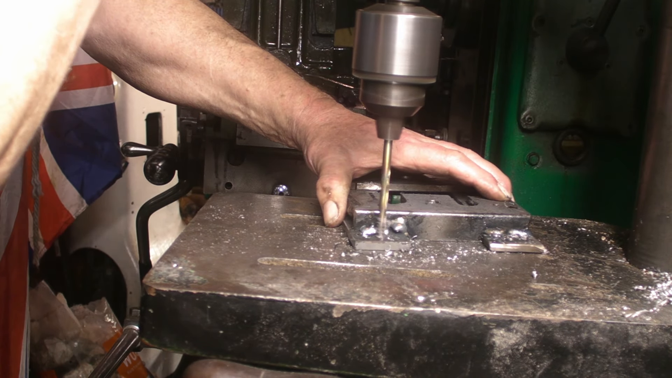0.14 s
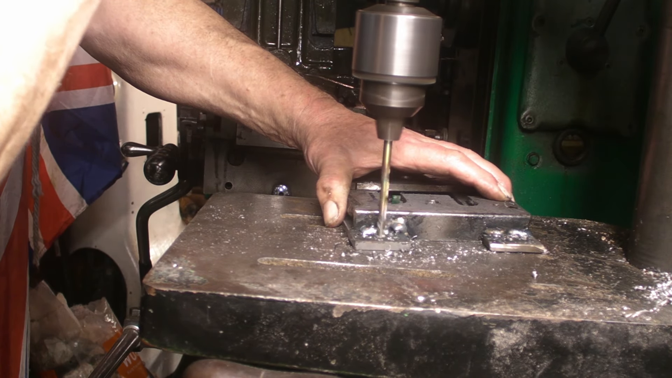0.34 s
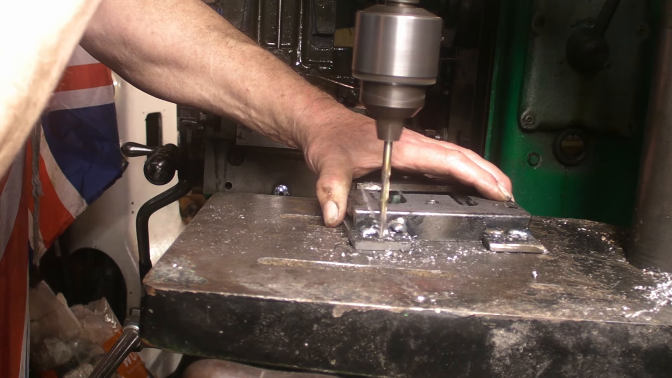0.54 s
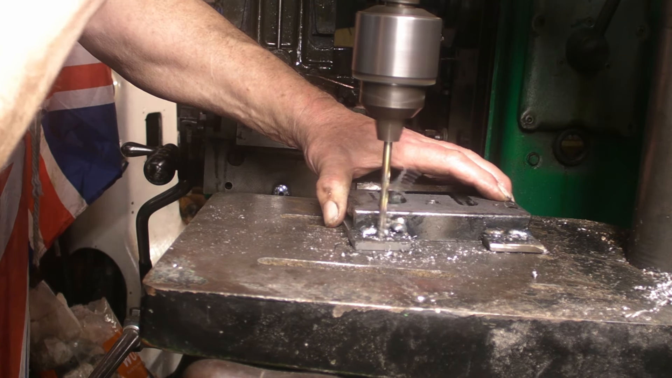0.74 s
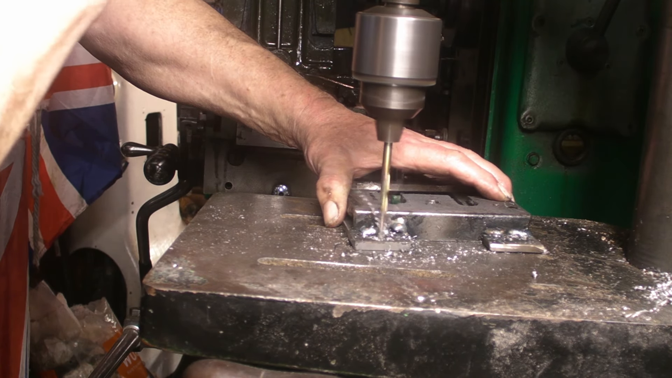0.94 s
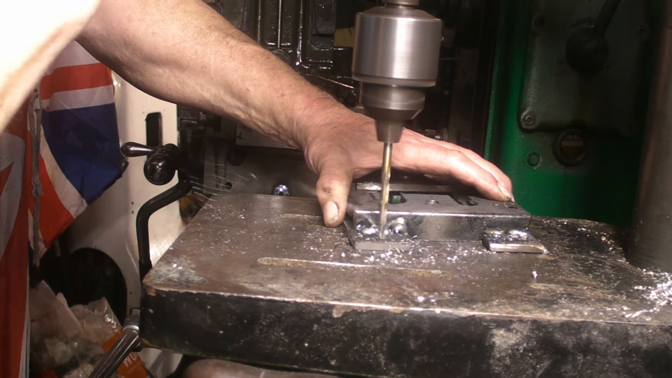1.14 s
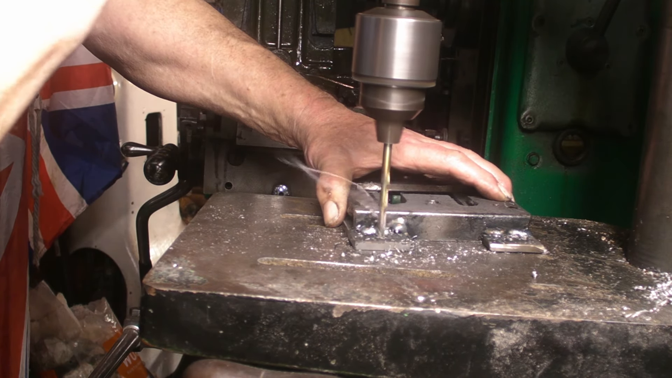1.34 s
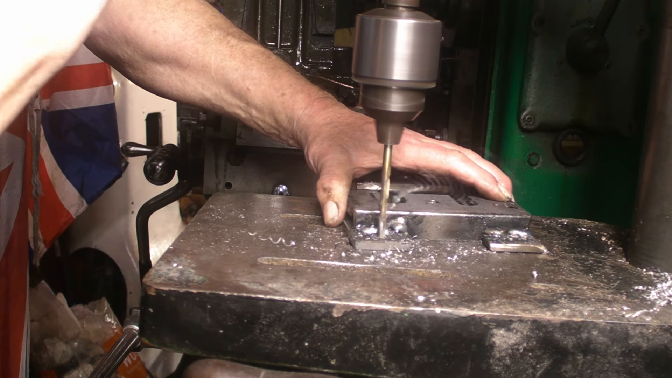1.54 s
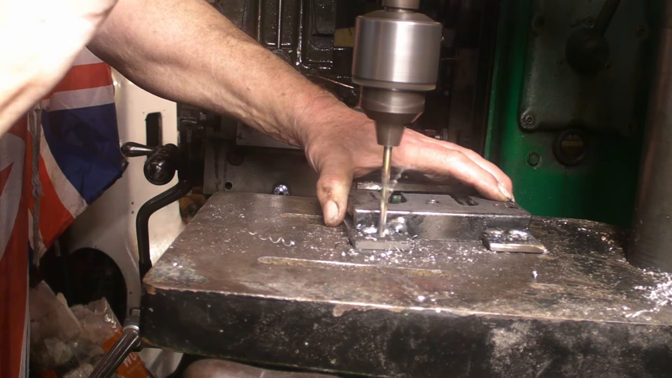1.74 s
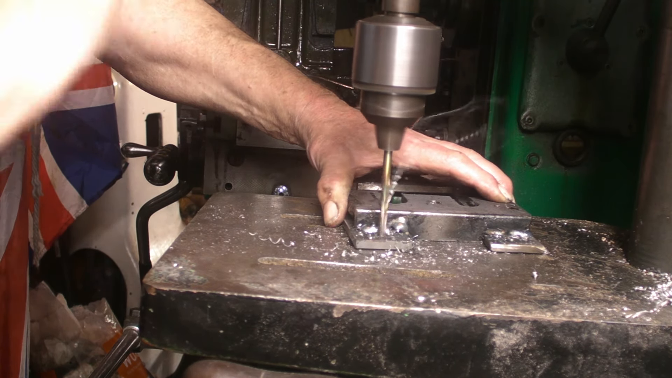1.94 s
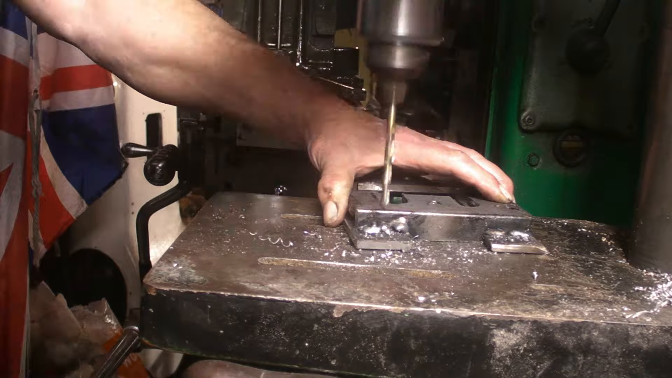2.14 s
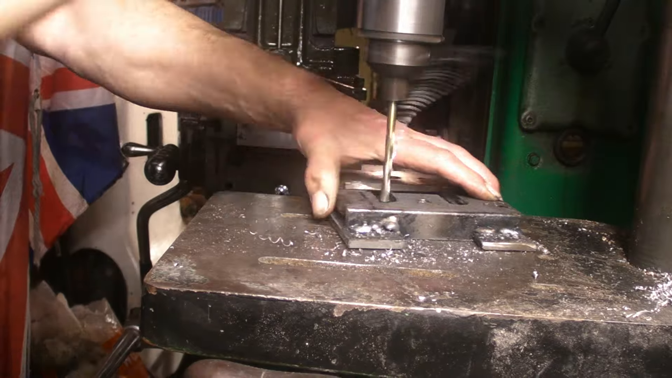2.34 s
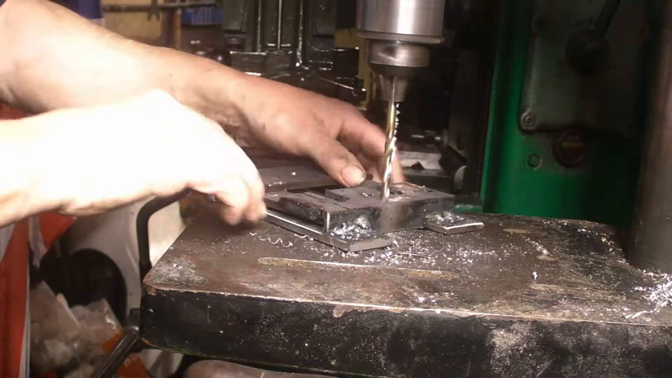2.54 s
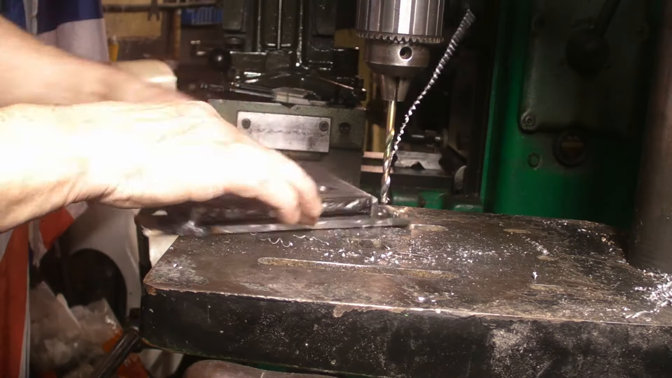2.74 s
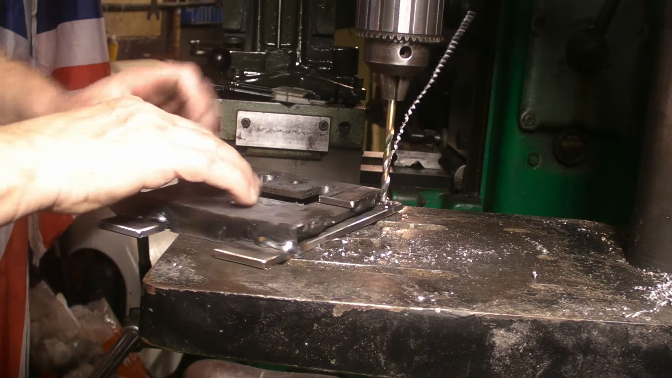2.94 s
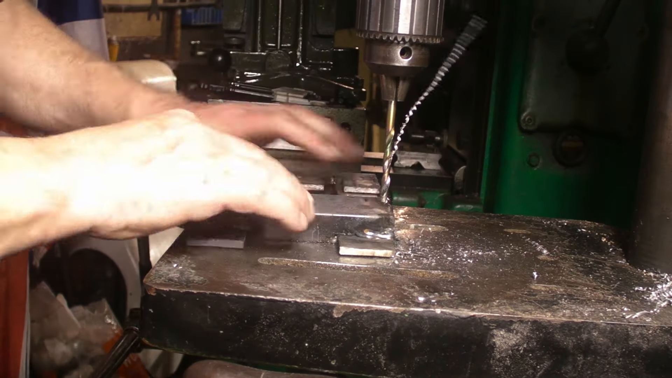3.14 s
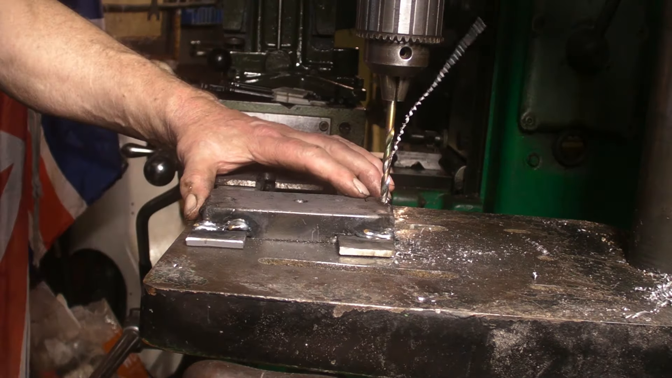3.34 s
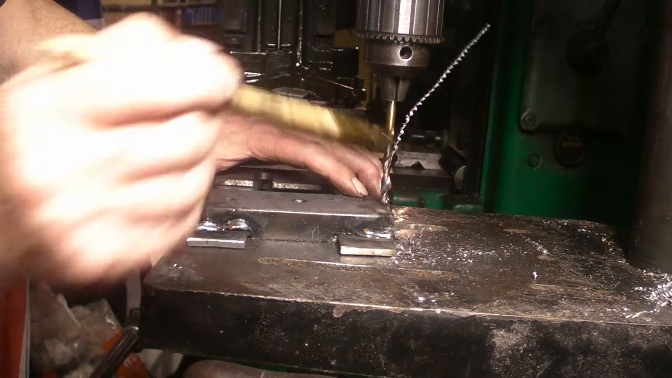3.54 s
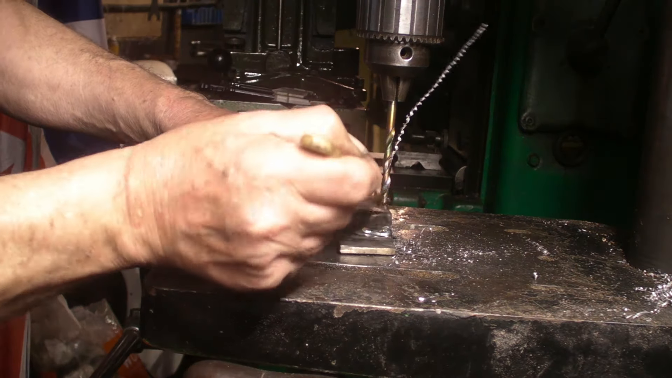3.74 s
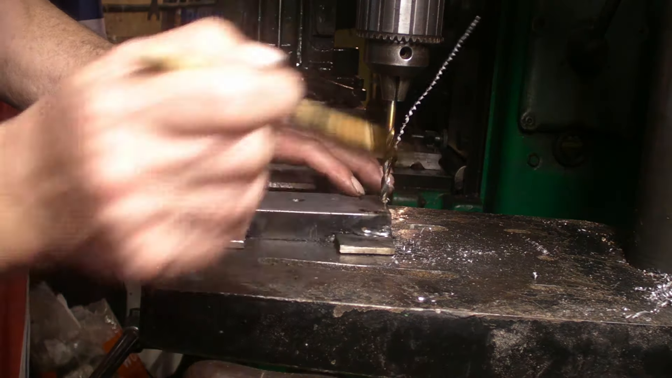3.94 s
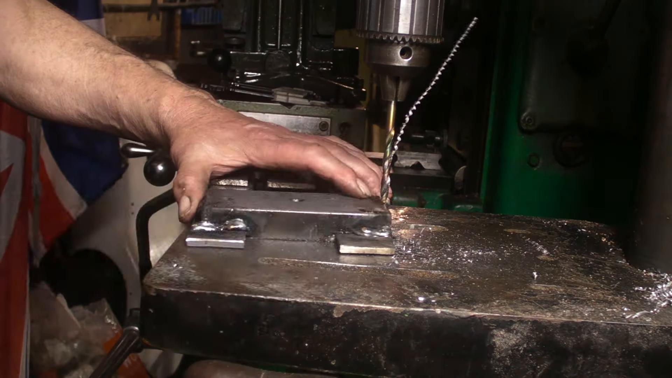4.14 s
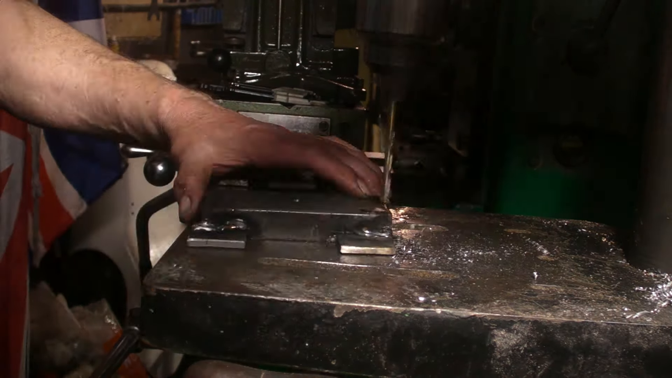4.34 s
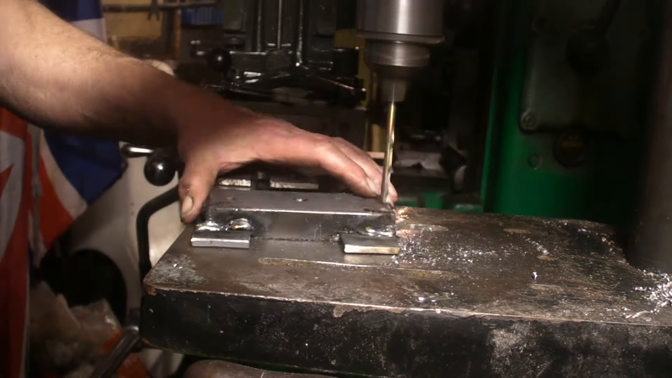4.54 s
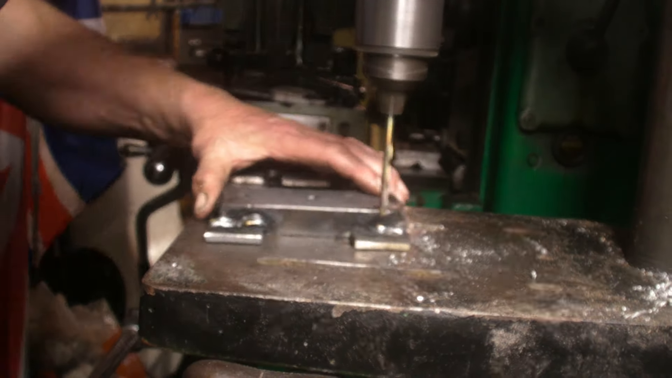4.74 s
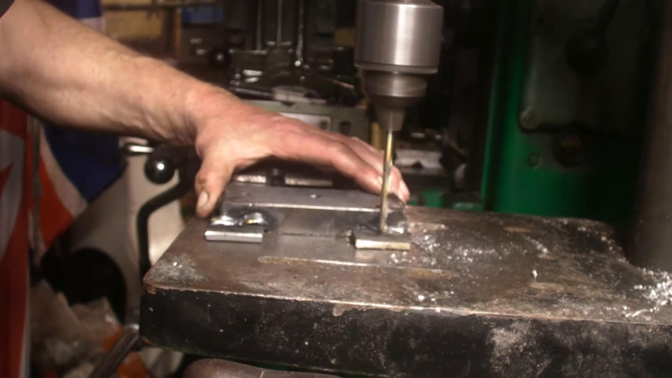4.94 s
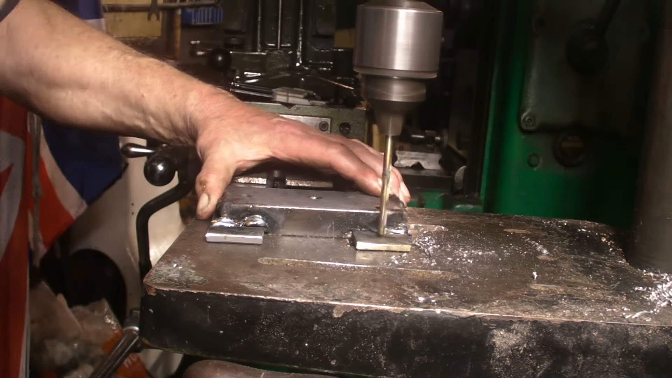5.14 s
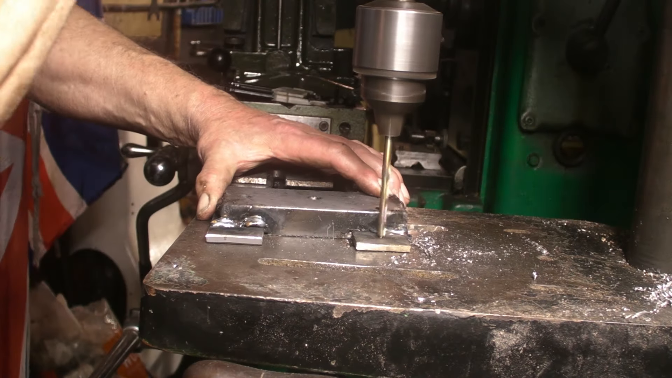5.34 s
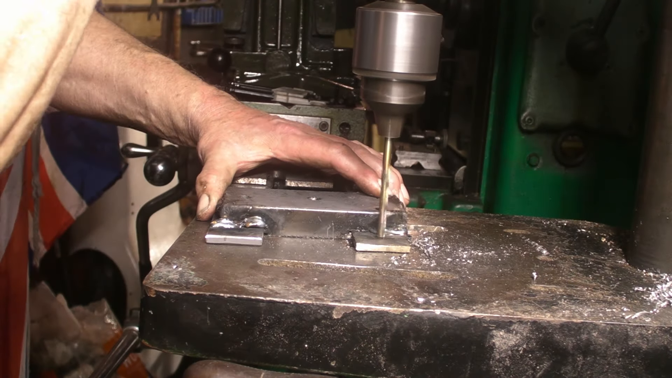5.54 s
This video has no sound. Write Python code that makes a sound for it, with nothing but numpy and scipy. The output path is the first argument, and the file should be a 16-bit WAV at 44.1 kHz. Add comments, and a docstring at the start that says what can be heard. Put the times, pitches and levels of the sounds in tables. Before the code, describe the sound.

Close in a small workshop, a pillar drill bores steel: low wavering motor hum, bright metallic hiss and coarse ringing crunch. The cut thins, squeals briefly and stops. The hand-held part scrapes and clatters over the iron table, followed by soft taps and a sharper knock in near quiet. A click restarts the motor and a lighter cut begins. Close stereo microphone, little echo.

```python
"""A pillar drill bores a small steel part held by hand on its cast-iron table, close by in a workshop.
The motor hums as wavering sines, the spindle's noise hisses through ringing steel, and the bit's lips
tear off chips as bursts of fracture grains that ring the part. The drill stops and its rub dies away;
the part is slid round with stick-slip scrapes, scratches, knocks and finger brushes.
Then comes a click, and the second hole begins."""
import sys
import numpy as np
from scipy import signal
from scipy.fft import rfft, irfft
from scipy.io import wavfile
from scipy.ndimage import uniform_filter1d, map_coordinates

SR = 44100
rng = np.random.default_rng(int(sys.argv[2]) if len(sys.argv) > 2 else 0)


def digitize_waveform(pressure):
    """Quantize a signal to 16-bit integers and store it at the path in sys.argv[1].

    Rows of a 2-D input are taken as channels; values are limited to [-1, 1].
    """
    field = np.atleast_2d(pressure).T
    bounded = np.clip(field, -1, 1)
    quanta = np.round(bounded * 32767).astype(np.int16)
    wavfile.write(sys.argv[1], SR, quanta)


N = 250488
TAPS = 8192  # length of a body's response in samples
TIME = np.arange(N) / SR
GRID = np.maximum(np.arange(TAPS // 2 + 1) * SR / TAPS, 1)  # Hz
SIDES = np.array([[1], [-1]])  # left, right

# Hush of the quiet workshop. Each row: frequency in Hz, relative level in dB.
ROOM_COLOUR = [(18, -33), (30, -3), (59, 0), (102, -3), (277, -1), (332, -6), (673, -7), (728, -7),
               (874, -12), (1440, -13), (4780, -15), (9190, -13), (15500, -25)]
ROOM_LEVEL_DB = -56.2

# Difference between the two channels. Each row: frequency in Hz, side minus mid in dB.
STEREO_WIDTH = [(60, -9.5), (130, -11), (300, -12), (700, -8), (1400, -4.8), (2800, -1), (15000, 0)]
# Balance of the two channels. Each row: frequency in Hz, left minus right in dB.
STEREO_LEAN = [(60, 1.8), (130, 2.8), (400, 2.7), (800, 1.8), (2500, 1.7), (5000, 1), (8500, -1),
               (11000, -2), (14000, -5)]
LEFT_LAG_S, TOP_HZ = .00009, 15600

# Skin on steel. Each row: frequency in Hz, relative level in dB.
RUB_COLOUR = [(1000, -25), (4000, -14), (7000, -7), (9500, 0), (11000, -7), (13000, -12), (15500, -20)]
# Fingers brushing over the part. Each row: peak in s, time from peak to 1/e in s, level in dB.
RUBS = [(2.591, .012, -35), (2.917, .007, -43), (3.272, .014, -53), (3.41, .02, -53), (3.44, .01, -53),
        (3.477, .009, -47), (3.542, .008, -53), (4.02, .025, -57), (4.155, .035, -56), (4.325, .018, -55)]

# Soft contact of hand and part. Each row: frequency in Hz, relative level in dB.
THUMP_COLOUR = [(40, -6), (130, 0), (300, 0), (600, -8), (1200, -17), (3000, -25), (9000, -24),
                (15000, -45)]
# Hand and bit settling on the part, and a clunk as the drill starts again. Each row: peak in s, time from peak
# to 1/e in s, level in dB.
THUMPS = [(2.435, .014, -28.5), (2.49, .01, -35), (2.67, .012, -38), (2.795, .012, -38), (3.424, .007, -42),
          (3.485, .012, -43), (3.692, .012, -47), (3.737, .017, -42.5), (3.892, .012, -51),
          (3.955, .012, -46), (4.388, .01, -32)]

# Swarf crushed under the part. Each row: frequency in Hz, relative level in dB.
GRIT_COLOUR = [(500, -12), (2000, -3), (4500, 0), (7000, -2), (9200, 2), (11000, -10), (12700, -18),
               (14500, -20), (16000, -30)]

# Body struck by a knock. Each row: frequency in Hz, relative level in dB.
KNOCK_COLOUR = [(60, -18), (200, -3), (520, 3), (800, -6), (1300, -4), (2200, -5), (3000, -10), (3600, -17),
                (4400, -9), (5500, -22), (15000, -45)]
# Resonances shared by every knock. Each row: frequency in Hz, nominal width in Hz, lift in dB.
KNOCK_MODES = [(1250, 90, 5), (1960, 90, 6), (2600, 140, 6), (3140, 100, 10), (4450, 80, 8), (5280, 90, 9)]
# Knocks and taps. Each row: start in s, thud in dB, tick in dB, decay to 1/e in s,
# resonance favoured by the point of contact in Hz, its lift in dB.
KNOCKS = [(2.444, -26, -32, .005, 2700, 17), (2.4965, -37, -16, .0035, 5860, 22),
          (3.424, -28, -59, .0025, 560, 17), (3.475, -37, -58, .006, 220, 19),
          (3.483, -36, -48, .0015, 900, 6), (3.653, -41, -60, .007, 285, 19),
          (3.724, -38, -44, .003, 1500, 8), (3.794, -37, -54, .005, 646, 22),
          (3.9575, -35, -36, .0018, 730, 10), (4.178, -16.7, -27, .005, 500, 7),
          (4.3385, -35, -36, .004, 3900, 12)]

# The table's lowest clear note. One row: frequency in Hz, decay by 60 dB in s.
TABLE_NOTE = (727, .25)
# Blows that leave the table ringing. Each row: start in s, level in dB.
RINGS = [(3.165, -47), (3.797, -54), (3.958, -56)]

# Sharp edges scratching steel. Each row: peak in s, time from peak to 1/e in s, level in dB,
# lower ring in Hz, upper ring in Hz, lift of both rings in dB.
SCRATCHES = [(2.263, .01, -24, 3470, 4110, 17), (2.364, .007, -26, 2650, 8400, 13),
             (2.386, .008, -25, 4500, 8090, 12), (2.413, .009, -26, 4950, 8490, 13),
             (2.43, .006, -27, 4300, 7900, 8), (2.446, .009, -22, 2710, 4740, 13),
             (2.497, .004, -23, 5860, 9200, 13), (2.508, .008, -31, 3300, 9200, 9),
             (2.528, .006, -29, 6000, 8200, 10), (2.795, .006, -26, 2900, 5200, 10),
             (2.922, .006, -42, 4240, 8800, 8), (2.968, .011, -35, 5000, 7600, 8),
             (3.072, .011, -37, 3600, 7500, 8), (3.15, .011, -32, 5900, 8600, 10),
             (3.176, .012, -42, 5700, 8800, 7), (4.342, .005, -37, 3900, 5200, 12)]

# The part on the iron table. Each row: frequency in Hz, relative level in dB.
TABLE_COLOUR = [(40, -20), (130, -11), (280, -5.5), (470, -3), (700, -1.5), (1000, -7), (1600, -2.5),
                (2000, -10), (2700, -12), (4000, -20), (9000, -30), (15000, -50)]
# Resonances of the table. Each row: frequency in Hz, nominal width in Hz, lift in dB.
TABLE_MODES = [(385, 50, 5), (583, 70, 9.5), (730, 14, 5), (890, 50, 2), (1160, 70, 5), (1370, 50, 12),
               (1540, 60, 5), (1740, 50, 4), (2090, 45, 7)]
# Scrapes and rubs. Each row: peak in s, length between its 1/e points in s, table level in dB,
# grit level in dB, resonance favoured by the point of contact in Hz, its lift in dB.
SLIDES = [(2.447, .022, -23.5, -27, 1530, 13), (2.478, .016, -29, -50, 760, 11),
          (2.53, .026, -36, -38, 1150, 10), (2.614, .024, -33, -54, 900, 14),
          (2.643, .034, -22.8, -41, 880, 14), (2.692, .014, -36, -50, 2090, 11),
          (2.736, .009, -29, -44, 1320, 14), (2.76, .012, -31, -44, 1340, 15),
          (2.795, .016, -27, -32, 1110, 10), (2.826, .012, -29, -43, 560, 12),
          (2.848, .01, -29, -56, 540, 10), (2.89, .016, -32, -44, 1700, 10),
          (2.95, .042, -19.3, -35.5, 570, 8), (2.964, .02, -25, -42, 1650, 14),
          (3.03, .014, -25, -41, 1620, 15), (3.044, .014, -25.5, -44, 1380, 15),
          (3.06, .032, -24, -37.5, 650, 13), (3.134, .021, -21.5, -32, 560, 6),
          (3.158, .018, -19, -33, 1370, 15), (3.272, .025, -57, -54, 1150, 8),
          (3.483, .021, -49, -54, 900, 8), (3.602, .042, -44.5, -49, 1750, 10),
          (3.664, .02, -46.5, -51, 680, 13), (3.692, .016, -47.5, -52, 1180, 12),
          (3.736, .02, -38.5, -44, 1180, 11), (3.765, .022, -43.5, -49, 830, 11),
          (3.84, .035, -52, -57, 650, 14), (3.894, .02, -50, -54, 1200, 10),
          (3.953, .015, -44, -42, 620, 10), (4.13, .045, -62, -56, 730, 8),
          (4.312, .022, -50, -58, 520, 10), (4.346, .016, -44, -41, 820, 10)]
# Steady movements over the table. Each row: start in s, end in s, table level in dB,
# grit level in dB, favoured resonance in Hz.
DRAGS = [(2.46, 2.55, -33, -46, 760), (2.6, 2.705, -37, -41.5, 900), (2.735, 2.81, -34.5, -40, 1340),
         (2.81, 2.915, -35, -49, 570), (2.895, 3.3, -57, -56, 730), (3.57, 3.88, -56, -61, 650),
         (3.91, 4.37, -74, -66, 730)]
DRAG_FADE_S, DRAG_UNEVEN_DB = .03, 2.2
RISE_SHARE = .45  # part of a stroke spent speeding up
STROKE_SQUARENESS = 1.9  # flatness of a stroke's top
GRIT_SPREAD = 1.15  # length of the grit's sound relative to its stroke

# Rub of the coasting bit. Each row: frequency in Hz, relative level in dB.
COAST_COLOUR = [(30, -30), (70, -11), (150, -1), (280, -1), (450, -2.5), (800, -3), (1500, -4), (2200, -12),
                (4000, -11), (6000, -12), (8800, -7), (10700, -12), (13000, -23), (15500, -31)]
# Resonances under that rub. Each row: frequency in Hz, nominal width in Hz, lift in dB.
COAST_MODES = [(150, 40, 4), (265, 50, 6), (580, 60, 7), (740, 45, 6), (1190, 70, 8), (1540, 110, 9),
               (2720, 160, 8), (4050, 220, 7), (4850, 250, 5), (8300, 400, 5)]
# level at switch-off, steady fall, duration and last fade of the rub
COAST_DB, COAST_SAG_DB_PER_S, COAST_S, COAST_FADE_S = -27, 20, .295, .06

# Motor runs. Each row: on in s, off in s, mean spindle hiss in dB, swells of the hiss per second,
# time of one crest in s, hum level in dB.
RUNS = [(-1, 2.266, -20, 2.05, .99, -2.5), (4.388, 7, -18, 2.8, 5.08, -.3)]
# Motor hum, one list for each run. Each row: mean frequency in Hz, level in dB before the run's hum level.
HUM_LINES = [
    [(150.7, -44), (301.5, -47), (403.7, -43), (549.1, -39), (705.2, -41)],
    [(129.2, -45), (263.8, -47), (398.4, -43), (500.6, -45), (694.4, -39)],
]
# Machine frame. Each row: frequency in Hz, relative level in dB.
FRAME_COLOUR = [(25, -50), (50, -22), (70, -12), (120, -5), (220, -7.5), (450, -6.5), (700, -8),
                (1200, -17), (3000, -34)]
# Resonances of the frame. Each row: frequency in Hz, nominal width in Hz, lift in dB.
FRAME_MODES = [(142, 50, 7.5), (272, 50, 5), (402, 36, 9), (505, 30, 4), (702, 36, 12)]
# Spindle and chuck. Each row: frequency in Hz, relative level in dB.
SPINDLE_COLOUR = [(1000, -22), (2300, -15), (2900, -11), (3700, -9.5), (4150, -6.5), (5800, -3.8),
                  (7000, -2), (9000, -.7), (10300, -.5), (10900, -6.5), (12200, -11), (12800, -20),
                  (13700, -13), (14700, -18), (15600, -32)]
# Their resonances. Each row: frequency in Hz, nominal width in Hz, lift in dB, left minus right in dB.
SPINDLE_MODES = [(6260, 70, 4, 0), (6885, 45, 9, 2), (6975, 35, 7, 2), (7170, 65, 12, 6), (7310, 40, 7, 2),
                 (7490, 60, 8, -5), (8170, 60, 3, -4), (8380, 90, 3, -4), (9070, 45, 6, 0),
                 (9390, 70, 6, -1), (9545, 70, 11, 0), (9710, 90, 6, -2), (9980, 120, 8, 3),
                 (10330, 150, 9, 4)]
SWELL_DB, RUMBLE_DB = .9, -28  # depth of the hiss's slow swell; level of the frame's rumble

# Stages of the work: first hole, breaking through, second hole. Each row: start in s, end in s,
# fade in in s, fade out in s, extra hiss in dB.
STAGES = [(-1, 1.7, .012, .25, 0), (1.7, 2.268, .25, .012, 2.1), (4.376, 7, .008, .012, 0)]
# Tearing metal, one list for each stage. Each row: frequency in Hz, relative level in dB.
CUT_COLOURS = [
    [(150, -20), (400, -8.5), (600, 0), (900, -.5), (1500, -4.5), (2400, -9.8), (3300, -10), (5000, -11.5),
     (8000, -16), (15000, -40)],
    [(150, -20), (400, -8), (600, -.5), (900, -2), (1500, -4), (2400, -10), (3400, -14), (5000, -12),
     (8000, -16), (15000, -40)],
    [(150, -20), (400, -9), (600, -.5), (900, -2), (1700, -4.7), (2300, -13), (2900, -10.5), (3700, -15),
     (5000, -12), (15000, -40)],
]
# Resonances of the hand-held part, one list for each stage. Each row: frequency in Hz,
# nominal width in Hz, lift in dB.
HOLE_MODES = [
    [(555, 75, 9), (805, 30, 5), (900, 60, 3), (1100, 35, 4), (1360, 80, 7), (1565, 50, 7), (1800, 40, 3),
     (1995, 140, 10.5), (2340, 130, 8), (2684, 36, 14), (2838, 30, 15.5), (3000, 300, 5), (3220, 90, 6),
     (4800, 110, 8), (5080, 90, 6), (5440, 90, 5)],
    [(490, 40, 6), (590, 50, 5), (1210, 70, 5), (1350, 60, 6), (1540, 70, 7), (1750, 70, 6), (2300, 200, 5),
     (2850, 120, 7)],
    [(590, 60, 5), (935, 50, 5), (1195, 45, 8), (1312, 35, 8), (1465, 45, 8), (1550, 50, 6), (1805, 55, 10),
     (1700, 60, 4), (2060, 120, 4), (2400, 60, 3), (2850, 130, 6), (3150, 100, 2)],
]
# How hard the bit is fed into the steel. Each row: time in s, cutting level in dB.
FEED = [(0, -20.5), (.35, -20.5), (.9, -21), (1.27, -20.4), (1.55, -21.2), (1.75, -24), (1.93, -27),
        (2.24, -26.5), (4.39, -28), (4.45, -30), (4.53, -27), (4.72, -27), (4.86, -27.4), (5.2, -27),
        (5.55, -25.5), (5.68, -26.5)]
# Moments when the bit grabs and squeals. Each row: peak in s, time from peak to 1/e in s,
# extra cutting level in dB, squeal in Hz, squeal level in dB, sag of the hiss in dB.
GRABS = [(2.053, .014, -22, 1530, -30, 4.5), (2.185, .018, -25, 1300, -28, 1),
         (2.264, .011, -29, 1455, -17, 5), (4.381, .005, -21, 1250, -25, 1),
         (4.391, .007, -20, 1080, -20, 1), (4.53, .045, -33, 1470, -26.5, 1),
         (4.735, .024, -35, 1465, -29, .5)]


def undb(db):
    """Level law: a gain is ten to the power of its decibels over twenty."""
    return 10 ** (np.asarray(db) / 20)


def unit(x):
    """Power normalisation: the signal is scaled to rms 1."""
    return x / np.sqrt(np.mean(x ** 2))


def slope(points, hz=GRID):
    """Spectral envelope: straight lines in dB over the logarithm of frequency."""
    f, db = np.transpose(points)
    return np.interp(np.log(hz), np.log(f), db)


def tint(x, points, share=1):
    """Zero-phase filtering: the spectrum is weighted without delay."""
    hz = np.maximum(np.arange(N // 2 + 1) * SR / N, 1)
    return irfft(rfft(x) * undb(share * slope(points, hz)), N)


def ring(force, colour, modes=()):
    """Forced vibration: a causal, minimum-phase body answers a force with resonances over a broad colour."""
    power = np.ones((2, len(GRID)))
    for hz, width, db, *pan in modes:
        lift = undb(db + SIDES * sum(pan) / 2) ** 2 - 1
        detuning = (GRID - hz) / (.7 * width)
        power = power + np.maximum(lift, 0) / (1 + detuning ** 2) ** 2
    cepstrum = irfft(np.log(undb(slope(colour)) * np.sqrt(power)))
    cepstrum[:, 1:TAPS // 2] *= 2  # a body answers only after it is pushed
    cepstrum[:, TAPS // 2 + 1:] = 0
    response = irfft(np.exp(rfft(cepstrum)))
    response = response / np.sqrt(np.sum(response ** 2) / 2)
    return signal.fftconvolve(force, response, axes=1)[:, :force.shape[1]]


def stereo(pair):
    """Mid-side coherence: two unrelated signals become channels alike in the bass and apart in the treble."""
    mid, side = pair[0], tint(pair[1], STEREO_WIDTH)
    return unit(mid + SIDES * side)


def noise():
    """Gaussian noise: countless independent pushes merge into a smooth stereo force."""
    return stereo(rng.standard_normal((2, N)))


def grains(rate, scatter_db):
    """Shot noise: tiny fractures or slips of scattered size strike at random, rate of them a second."""
    size = (rng.random(N) < rate / SR) * undb(scatter_db * rng.standard_normal(N))
    return stereo(size * rng.standard_normal((2, N)))


def walk(rate):
    """Band-limited fluctuation: random points, rate a second, joined by lines, with spread near 1."""
    steps = rng.standard_normal(4096)
    return 1.2 * np.interp(TIME * rate, np.arange(len(steps)), steps)


def switched(on, off, fade_in=.012, fade_out=.012):
    """Gating: 1 between on and off, with sloped ends centred on those times."""
    return np.clip((TIME - on) / fade_in + .5, 0, 1) * np.clip((off - TIME) / fade_out + .5, 0, 1)


def bump(s, length):
    """Gaussian envelope: a smooth rise and fall around one moment."""
    return np.exp(-((TIME - s) / length) ** 2)


def around(s):
    """Locality: the stretch of samples in which a short event lives."""
    return slice(int(s * SR) - TAPS, int(s * SR) + TAPS)


def sine(hz, waver, rate):
    """Frequency modulation: the phase integrates a frequency that wavers by a share of itself."""
    return np.sin(2 * np.pi * np.cumsum(hz * (1 + waver * walk(rate))) / SR)


def drift(pair, depth_s, rate):
    """Varying delay: sound read a little early or late makes resonances slide as the contact shifts."""
    late = depth_s * uniform_filter1d(walk(rate), int(SR / rate))
    return np.array([map_coordinates(side, [(TIME - late) * SR], mode="mirror") for side in pair])


def workshop(near, echo_db=-25, t60=.25):
    """Diffuse reverberation: cluttered walls return a faint, short, decaying echo over the room's own hush."""
    t = TIME[:TAPS]
    tail = rng.standard_normal((2, TAPS)) * undb(-60 * t / t60)
    tail = tail / np.sqrt(np.sum(tail ** 2) / 2)
    echo = signal.fftconvolve(near, tail, axes=1)[:, :N]
    hush = undb(ROOM_LEVEL_DB + .7 * walk(9)) * ring(noise(), ROOM_COLOUR)
    return undb(echo_db) * echo + hush


def finger_rubs(grain_db=2):
    """Light friction: skin brushing over steel and fine swarf gives a thin hiss of small slips."""
    touch = sum(undb(db) * bump(s, length) for s, length, db in RUBS)
    return ring(grains(5000, grain_db) * touch, RUB_COLOUR)


def thumps():
    """Soft impact: hand and bit settle gently on the part and the drill clunks as it restarts, so mostly bass
    comes out."""
    push = sum(undb(db) * bump(s, length) for s, length, db in THUMPS)
    return ring(noise() * push, THUMP_COLOUR)


def knocks(width_hz=100):
    """Impact excitation: short blows of hand, part and machine favour a resonance at each point of contact."""
    thuds, tick, contact = np.zeros((2, N)), 0, noise()
    for s, thud_db, tick_db, decay, hz, lift_db in KNOCKS:
        span = around(s)
        blow = (TIME >= s) * np.exp(-np.abs(TIME - s) / decay)
        force = undb(thud_db) * blow[span] * contact[:, span]
        thuds[:, span] += ring(force, KNOCK_COLOUR, KNOCK_MODES + [(hz, width_hz, lift_db)])
        tick = tick + undb(tick_db) * blow
    return thuds + ring(noise() * tick, GRIT_COLOUR)


def table_note():
    """Free decay: after a blow the iron table sings on faintly at one note, dying exponentially."""
    hz, t60 = TABLE_NOTE
    out = 0
    for s, db in RINGS:
        age = np.maximum(TIME - s, 0)
        out = out + undb(db) * np.exp(-np.log(1000) * age / t60) * np.sin(2 * np.pi * hz * age)
    return out


def scratches(width_hz=200, judder_db=1.5):
    """Skidding contact: flutes, burrs and trapped chips slip over steel, each ringing at two pitches."""
    out = np.zeros((2, N))
    skids = grains(14000, 1.5) * undb(judder_db * walk(400))
    for s, length, db, low_hz, high_hz, lift_db in SCRATCHES:
        span = around(s)
        force = undb(db) * bump(s, length)[span] * skids[:, span]
        out[:, span] += ring(force, GRIT_COLOUR, [(low_hz, width_hz, lift_db), (high_hz, width_hz, lift_db)])
    return out


def sliding(judder_db=1.4, width_hz=50, shared=.95, pan_db=-1.4, drag_width_hz=35,
            drag_favour_db=13, catch_db=-10, drift_s=.00015):
    """Stick-slip friction: each stroke of steel over iron rings the table its own way, and swarf crackles."""
    judder = undb(judder_db * walk(300))
    push, out, crush = undb(DRAG_UNEVEN_DB * walk(35)), 0, 0
    creep = grains(7000, 1.5) * judder
    for on, off, table_db, grit_db, hz in DRAGS:
        moving = push * switched(on, off, DRAG_FADE_S, DRAG_FADE_S)
        modes = TABLE_MODES + [(hz, drag_width_hz, drag_favour_db)]
        out = out + ring(undb(table_db) * moving * creep, TABLE_COLOUR, modes)
        crush = crush + undb(grit_db) * moving
    # fine slips and coarse catches on burrs
    slips = (grains(7000, 1.5) + undb(catch_db) * grains(450, 2)) * judder
    # during a stroke the pressing hand damps the table's own resonances a little
    pressed = [(hz, width, shared * db) for hz, width, db in TABLE_MODES]
    for s, length, table_db, grit_db, hz, lift_db in SLIDES:
        span = around(s)
        t = TIME[span] - s
        reach = np.abs(t / (length * np.where(t < 0, RISE_SHARE, 1 - RISE_SHARE)))
        stroke = np.exp(-reach ** STROKE_SQUARENESS)
        force = undb(table_db) * stroke * slips[:, span]
        out[:, span] += ring(force, TABLE_COLOUR, pressed + [(hz, width_hz, lift_db)])
        crush[span] += undb(grit_db) * np.exp(-(reach / GRIT_SPREAD) ** STROKE_SQUARENESS)
    crackle = ring(grains(14000, 2) * crush * judder, GRIT_COLOUR)
    return undb(SIDES * pan_db / 2) * drift(out, drift_s, 30) + crackle


def coasting(judder_db=1.6, drift_s=.0009):
    """Dry friction: with the motor off, the flutes rub the hole's wall, fading at a shifting pitch."""
    off = RUNS[0][1]
    level = undb(COAST_DB - COAST_SAG_DB_PER_S * (TIME - off))
    rub = switched(off, off + COAST_S, fade_out=COAST_FADE_S) * level
    force = grains(9000, 2) * undb(judder_db * walk(200)) * rub
    return drift(ring(force, COAST_COLOUR, COAST_MODES), drift_s, 30)


def machine(hiss_wander_db=.6, rumble_wander_db=1.1, flutter_db=.5, waver=.006, hum_wander_db=1.6):
    """Structure-borne noise: belt and bearings shake frame and spindle; the hiss sags at grabs, the hum wavers."""
    running, drive, hum = 0, 0, 0
    for (on, off, hiss_db, rate, crest, hum_db), lines in zip(RUNS, HUM_LINES):
        gate = switched(on, off)
        running = running + gate
        swell = SWELL_DB * np.cos(2 * np.pi * rate * (TIME - crest))
        drive = drive + gate * undb(hiss_db + swell)
        for hz, db in lines:
            level = undb(hum_db + db + hum_wander_db * walk(25))
            hum = hum + gate * level * sine(hz, waver, 60)
    lift = sum(db * switched(*span) for *span, db in STAGES)
    sag = sum(db * bump(s, length) for s, length, *_, db in GRABS)
    rolling = grains(24000, 1) * undb(flutter_db * walk(70) + hiss_wander_db * walk(16))
    hiss = ring(rolling * drive * undb(lift - sag), SPINDLE_COLOUR, SPINDLE_MODES)
    shaking = noise() * running * undb(RUMBLE_DB + rumble_wander_db * walk(18))
    return hiss + ring(shaking, FRAME_COLOUR, FRAME_MODES) + hum


def squeals(waver=.015):
    """Self-excited vibration: for a moment the bit's chatter locks to one resonance of the part."""
    out = 0
    for s, length, _, hz, db, _ in GRABS:
        out = out + undb(db) * bump(s, length) * sine(hz, waver, 300)
    return out


def cutting(bite_db=.9, surge_db=.5, chip_db=-11, drift_s=.00018):
    """Fracture noise: uneven bites and snapping chips ring the part, with other resonances in each stage."""
    out = 0
    grab = sum(undb(db) * bump(s, length) for s, length, db, *_ in GRABS)
    feed = undb(np.interp(TIME, *np.transpose(FEED)) + surge_db * walk(30)) + grab
    tearing = grains(9000, 1.6) * undb(bite_db * walk(150))
    chips = undb(chip_db) * grains(220, 2)
    force = (tearing + chips) * feed
    for (*span, _), colour, modes in zip(STAGES, CUT_COLOURS, HOLE_MODES):
        out = out + ring(force * np.sqrt(switched(*span)), colour, modes)
    return drift(out, drift_s, 14)


def scene():
    """Superposition: the sounds of drill, part and hand add up, and the room answers their sum."""
    drill = machine() + cutting() + squeals() + coasting()
    handling = sliding() + scratches() + knocks() + table_note() + thumps() + finger_rubs()
    near = drill + handling
    return near + workshop(near)


def record(dry):
    """Interchannel difference: the left is bassier and a little later, the right brighter; the top is cut."""
    left = map_coordinates(dry[0], [(TIME - LEFT_LAG_S) * SR], mode="nearest")
    heard = tint(np.array([left, dry[1]]), STEREO_LEAN, SIDES / 2)
    return signal.sosfilt(signal.ellip(8, .2, 70, TOP_HZ, fs=SR, output="sos"), heard)


dry = scene()
out = record(dry)
digitize_waveform(out)
```